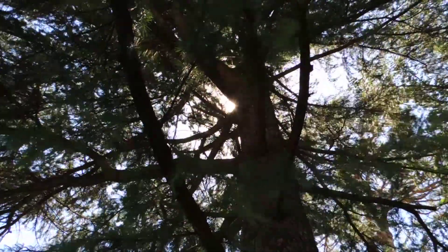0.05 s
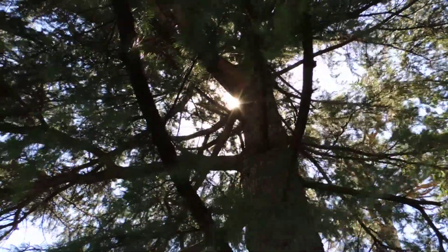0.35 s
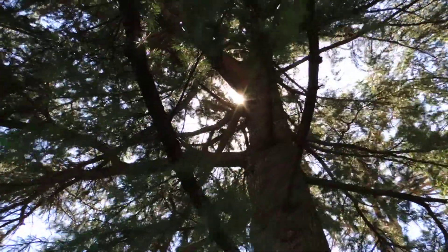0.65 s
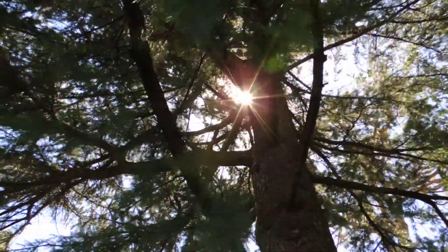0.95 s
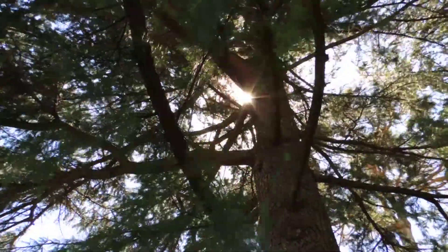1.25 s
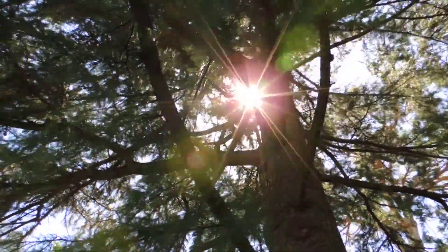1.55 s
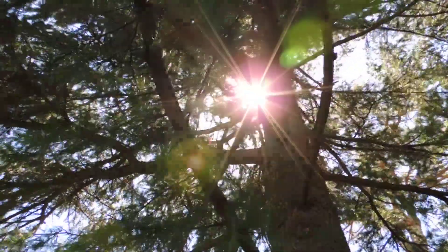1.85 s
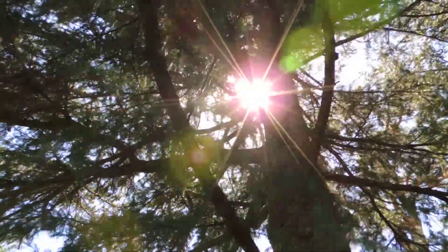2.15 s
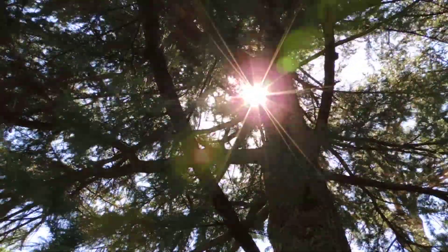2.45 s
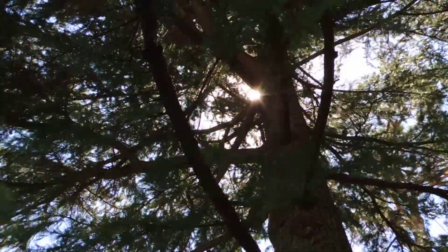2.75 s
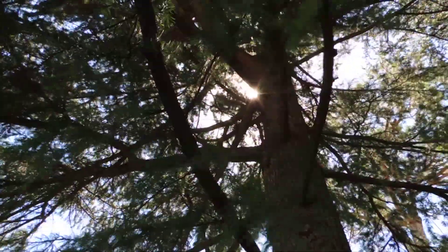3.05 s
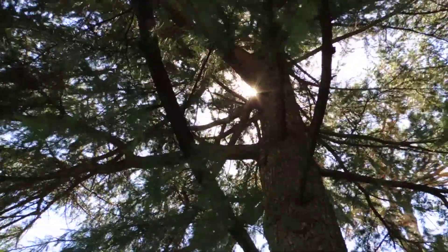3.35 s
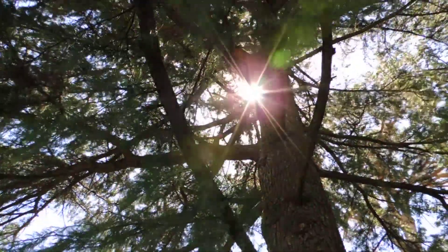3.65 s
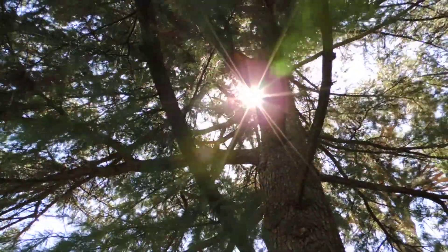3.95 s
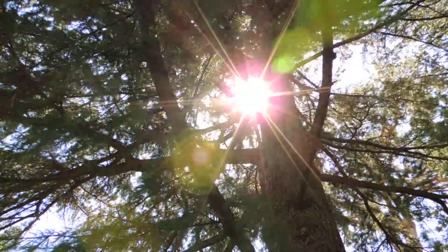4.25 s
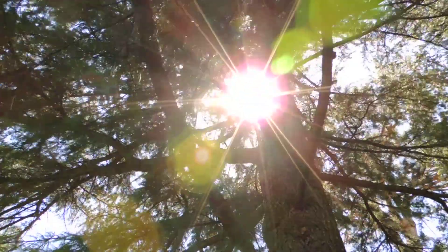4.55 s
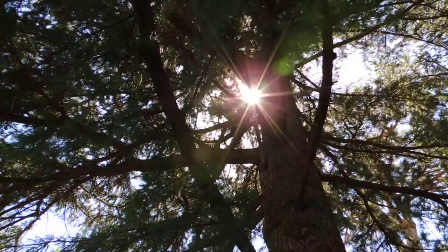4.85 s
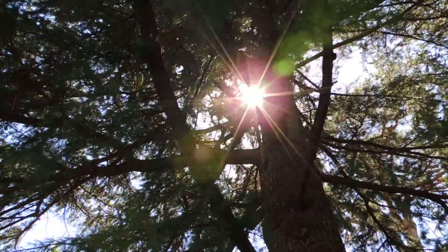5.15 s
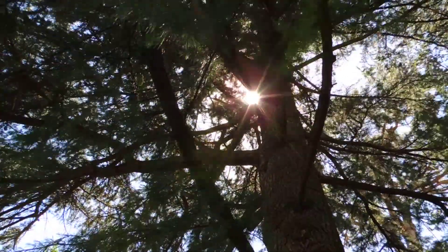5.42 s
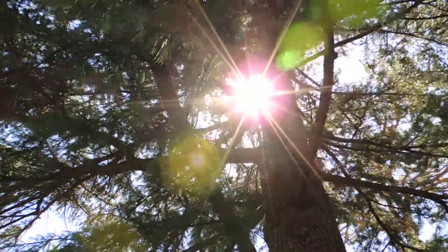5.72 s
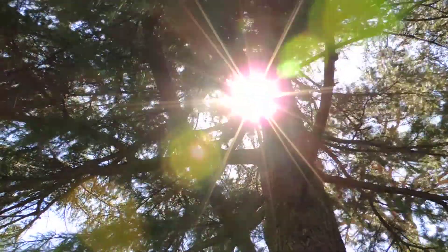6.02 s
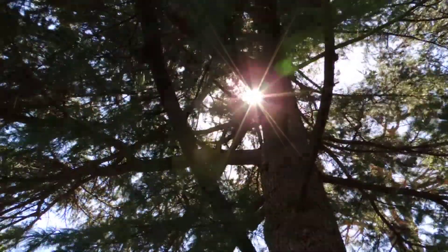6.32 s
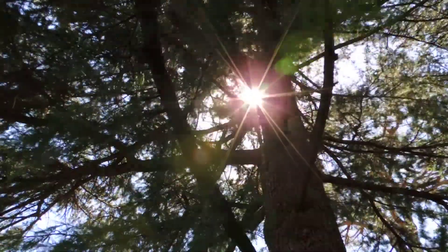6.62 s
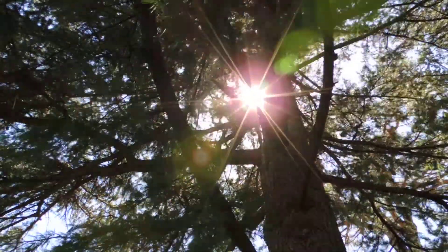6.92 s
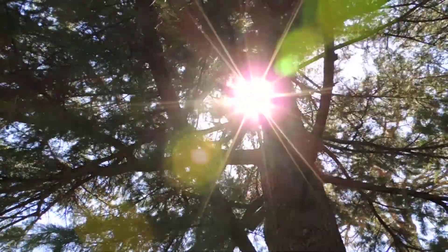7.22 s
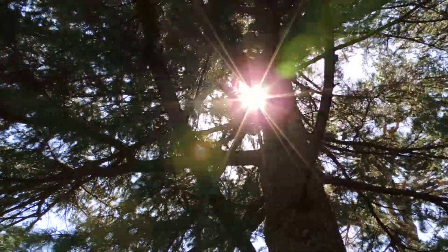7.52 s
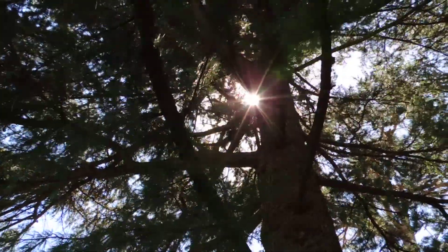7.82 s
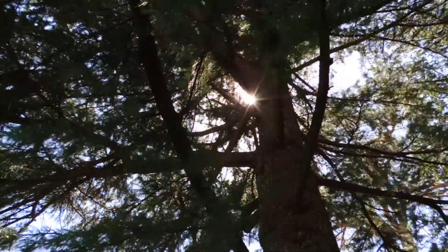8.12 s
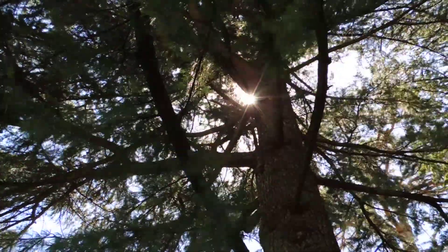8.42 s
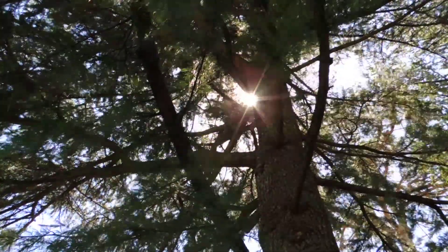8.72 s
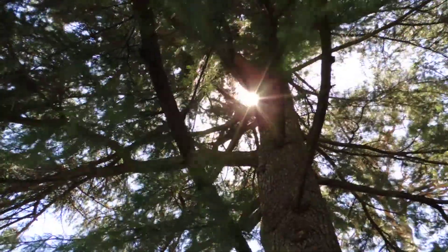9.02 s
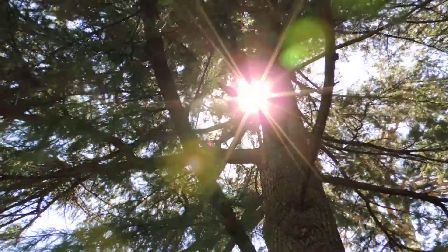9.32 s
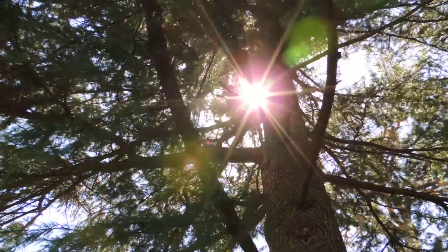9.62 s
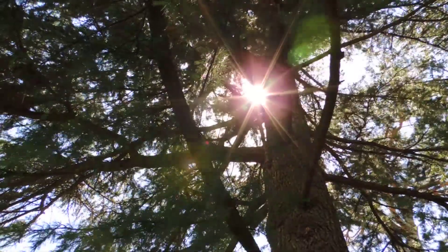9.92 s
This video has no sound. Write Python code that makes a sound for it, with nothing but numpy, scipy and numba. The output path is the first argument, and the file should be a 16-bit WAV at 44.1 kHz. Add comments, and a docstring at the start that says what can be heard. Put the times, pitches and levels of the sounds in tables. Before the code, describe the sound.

Wind rushes steadily through a conifer overhead, a soft roar with a hiss of needles. For the first three seconds, gusts buffet the hand-held microphone with low rumble and sharp thumps. The buffeting then eases and dry twigs tick faintly. Lighter gusts return, a distant bird gives one faint thin note, and a hand brushes the microphone as the wind in the tree slackens.

```python
"""Wind rushes through the crown of a conifer above a hand-held camera. From the start, gusts buffet
the two microphone ports and burst into thumps; the hardest, near 1 s and 2.6 s, make the gain control
duck everything. After 3 s the buffeting eases, and dry twigs tick now and then as they touch.
Near 8 s a far bird gives one thin note. Then, as the wind in the tree slackens, a hand brushes
the camera among the last gusts."""
import sys
import numpy as np
from scipy import signal
from scipy.fft import rfft, irfft, next_fast_len
from scipy.io import wavfile
from scipy.ndimage import uniform_filter1d, map_coordinates
from numba import njit

SR = 44100
rng = np.random.default_rng(int(sys.argv[2]) if len(sys.argv) > 2 else 0)


def wrap_up_sound(samples):
    """Save the sound to the file named by the first command line argument, as 16-bit audio."""
    columns = np.atleast_2d(samples).T
    # keep every value between -1 and 1, then stretch to whole-number steps
    tamed = np.clip(columns, -1, 1)
    steps = np.round(tamed * 32767).astype(np.int16)
    wavfile.write(sys.argv[1], SR, steps)


N = 439677
TIME = np.arange(N) / SR
BURST_TIME = np.arange(-.03, .03, 1 / SR)  # a 60 ms frame centred on a hit

# Levels in the tables are relative; each layer sets its own trim.
# gusts that hit the camera: peak_s, rise_s, left_db, right_db
GUSTS = [(0.02, 0.15, -12.5, -16.5), (0.29, 0.076, -7, -19), (0.48, 0.036, -9, -15.5),
         (0.561, 0.023, -9, -16), (0.73, 0.062, -15, -16.5), (0.96, 0.077, -10, -8), (1.09, 0.024, -7, -2),
         (1.27, 0.21, -5, -18), (1.6, 0.075, -12, -17), (2.291, 0.035, -22, -4), (2.48, 0.074, -5.5, -7),
         (2.678, 0.11, 4.5, 0.5), (2.83, 0.093, -0.5, 0.5), (3.05, 0.15, -2, -8.5),
         (4.31, 0.066, -30, -18.5), (4.52, 0.083, -29, -24), (5.2, 0.057, -28, -34),
         (5.95, 0.065, -30, -17.5), (6.051, 0.069, -20, -16.5), (6.269, 0.026, -19, -17),
         (6.39, 0.063, -28, -21), (6.63, 0.061, -36, -22.5), (6.94, 0.033, -25, -21.5),
         (7.12, 0.039, -28, -19), (7.33, 0.026, -22, -14), (7.52, 0.17, -24.5, -18),
         (7.732, 0.054, -21.5, -12), (7.87, 0.12, -27, -17.5), (8.33, 0.021, -22, -36),
         (8.65, 0.045, -16, -31), (9.114, 0.037, -9.5, -23.5), (9.22, 0.032, -20, -23.5),
         (9.85, 0.12, -33, -23.5)]
# light air that always moves round the camera: time_s, level_db
BREEZE = [(0, -19.5), (1.85, -25.5), (3.3, -25), (3.9, -31), (4.7, -40), (5.6, -40.5), (6.1, -31.5),
          (8.9, -32), (9.3, -33), (9.55, -53), (9.97, -32)]
# large, medium and small eddies at a port: frequency_hz, level_db
RUMBLE_EQ = [(10, -43), (25, 0.5), (40, -1.5), (65, 1.5), (100, -1), (160, -5.5), (250, -17), (400, -27.5),
             (800, -69), (2000, -77)]
FLUTTER_EQ = [(40, -17), (110, 1), (190, 5), (320, -0.5), (500, -10.5), (800, -22), (1400, -46),
              (2500, -46), (6000, -77)]
SPUTTER_EQ = [(150, 2), (400, 12), (700, 4), (1100, -4.5), (1700, -18), (2600, -45.5), (6000, -53)]
# eddies that burst on a port: centre_s, level_db, relative_crack_db, side (1 left, -1 right)
THUMPS = [(0.492, 2.5, -19, 1), (0.554, 2, -17.5, 1), (0.85, 1, -17, -1), (1.05, 0, -11, -1),
          (1.088, 8.5, -1.5, -1), (1.095, 10, -3.5, -1), (1.108, 6, -0.5, -1), (1.131, 8, -18, -1),
          (1.191, 5, -16, -1), (2.29, 3, 4, -1), (2.304, 3.5, -10, -1), (2.389, 1, -17.5, -1),
          (2.422, 2, -9, -1), (2.588, 11.5, -14, -1), (2.605, 8.5, 1, -1), (2.667, 3.5, -6, -1),
          (2.702, 2.5, -2, -1), (2.752, 6.5, -5, -1), (2.943, 8, -8.5, -1), (2.951, 5.5, -3.5, -1),
          (4.32, -4, -9.5, -1), (4.889, -15.5, -37, 1), (5.194, -10, -34.5, 1), (6.388, -9, -19, -1),
          (6.592, -12.5, -18, -1), (6.665, -9.5, -27.5, -1), (6.97, -8, -28, -1), (7.325, -3, -13, -1),
          (7.336, -6, -15.5, -1), (7.462, -7, -17, -1), (9.117, -6, -23, 1), (9.9, -8, -5.5, -1)]
# a thump's midrange crack and the brighter edge that grows on the hardest ones: frequency_hz, level_db
CRACK_EQ = [(300, 3), (900, 12), (1800, 1), (3000, -18), (5000, -34), (14000, -36)]
TEAR_EQ = [(800, -3), (1400, 4), (2100, 0), (3000, -9), (4500, -21), (7000, -24), (14000, -35)]
# strength of the wind in the crown: time_s, level_db
CROWN_WIND = [(0, 0), (0.5, 1), (0.75, -1), (2.2, -0.5), (4.1, 0.7), (5.25, -2.5), (6.3, -0.5), (7.64, -4),
              (8.0, -3), (9.55, -7), (9.97, -7)]
# wind over thick boughs, thin boughs and needles: frequency_hz, level_db
ROAR_EQ = [(100, -6), (250, -3.5), (450, -1), (620, 1.5), (900, 0.5), (1300, -6), (2000, -34), (4000, -54)]
BOUGH_EQ = [(400, -9), (900, -9.5), (1300, -1), (1850, -0.5), (2500, -5.5), (3500, -9), (6000, -19),
            (14000, -32)]
NEEDLE_EQ = [(600, 2.5), (2000, -3), (3200, 2), (5000, 1.5), (7000, 0.5), (10000, -1.5), (12500, -1.5),
             (14300, -6.5)]
# how alike the tree sounds at the two ports: frequency_hz, likeness (0 wide, 1 or more mono)
TREE_LIKENESS = [(200, 5), (700, 1.15), (1300, 1.6), (2000, 1.16), (3000, 0.29), (8000, -0.0847)]
# where the tree sits in the stereo image: frequency_hz, left_minus_right_db
TREE_PAN = [(700, 0.26), (1900, -1.2), (4000, -.2), (9000, 0.47)]
# dry twigs touching: time_s, level_db
TWIG_TICKS = [(2.2508, -19.5), (2.9781, -28), (3.5174, -27), (4.2094, -27), (5.4494, -25), (7.9494, -27),
              (7.9753, -25)]
# a hand brushing the case: start_s, level_db, rise_s
HAND_STROKES = [(8.637, -30.5, 0.026), (9.698, -24.5, 0.028), (9.765, -39, 0.018)]
# skin rubbing on the case: frequency_hz, level_db
SKIN_EQ = [(300, -32), (800, 1.5), (1200, 5), (1900, -3), (2800, -16), (6000, -23), (14000, -48)]


def buffeting(port, flutter_db, sputter_db, moderate_db=-15, max_excess_db=4.5):
    """Eddies at one port: faster air adds smaller, brighter and more ragged ones to the rumble."""
    air_db, depth_db = airflow(port)
    excess_db = np.minimum(air_db - moderate_db, max_excess_db)  # drives the brightness
    flap_db = 1.7 * wobble(22)
    rumble = amp(air_db + flap_db - 0.21 + .5 * depth_db) * turbulence(RUMBLE_EQ, steady_s=0.0634)
    ragged = unit(amp(flap_db + 3.33 * wobble(45) + 3.76 * wobble(160)))
    flutter_gain = amp(air_db + flutter_db + 0.15 * excess_db - 1.02 * depth_db)
    flutter = flutter_gain * ragged * turbulence(FLUTTER_EQ, steady_s=0.0405)
    # the flow tears off the edge of the port in short, separate spurts
    spurts = unit(np.clip(0.39 * wobble(40) + wobble(220) - .2, 0, 1.5))
    sputter_gain = amp(air_db + sputter_db + 1.4 * excess_db)
    sputter = sputter_gain * spurts * turbulence(SPUTTER_EQ, steady_s=0.0135)
    return rumble + flutter + sputter


def airflow(port, fall_ratio=0.91, roundness=1.26, neutral_rise_s=0.094, depth_db_per_octave=3):
    """Air strength and eddy depth in dB: gusts ride a restless breeze, longer ones with deeper eddies."""
    power = amp(automation(BREEZE) + 1.6 * wobble(9)) ** 2
    weighted_octaves = np.zeros(N)
    for peak_s, rise_s, *port_db in GUSTS:
        from_peak = np.maximum(peak_s - TIME, (TIME - peak_s) / fall_ratio) / rise_s
        near = from_peak < 5
        gust_power = (amp(port_db[port]) * np.exp(-from_peak[near] ** roundness)) ** 2
        power[near] += gust_power
        weighted_octaves[near] += gust_power * np.log2(rise_s / neutral_rise_s)
    return 10 * np.log10(power), depth_db_per_octave * weighted_octaves / power


def turbulence(eq, steady_s):
    """Pressure noise at one port, its slow swings evened out so that the gust sets its strength."""
    noise = coloured(rng.standard_normal(N), eq)
    return noise / np.sqrt(running_power(noise, steady_s) + 1e-6)


def thumps(width_cycles=0.6, thud_hz=392, octaves_per_db=0.0645):
    """An eddy bursts on one port: a swing or two of pressure with a rough crack on top."""
    out = np.zeros((2, N))
    phases = rng.uniform(0, 2 * np.pi, len(THUMPS))
    for (centre_s, level_db, crack_db, side), phase in zip(THUMPS, phases):
        hz = thud_hz * 2 ** (octaves_per_db * crack_db)  # less crack, lower thud
        turns = np.arcsinh(2 * hz * BURST_TIME) / 2 + hz * BURST_TIME / 10  # quickest as the core passes
        swing = np.exp(1j * (2 * np.pi * turns + phase) - (turns / width_cycles) ** 2 / 2)
        thud = amp(-4) * np.imag(swing + amp(-3.5) * swing ** 2)  # steepened at its height
        crack = amp(crack_db - 4.5) * puff(CRACK_EQ, width_s=0.0014)
        tear = amp(1.5 * crack_db - 11.5) * puff(TEAR_EQ, width_s=0.0013)  # grows faster than the crack
        add(out[int(side < 0)], centre_s - .03, amp(level_db) * (thud + crack + tear))
    return out


def tree(roar_follows=0.44, needles_follow=0.68):
    """Thick boughs roar, thin ones rush, needles hiss; the roar lingers as the wind slackens."""
    wind_db = automation(CROWN_WIND) + .3 * wobble(8)
    roar = amp(roar_follows * wind_db - 35.5) * rush(ROAR_EQ, patchy_db=1.36, lag_ms=0.098)
    boughs = amp(wind_db - 34.5) * rush(BOUGH_EQ, patchy_db=0.9, lag_ms=0.098)
    needles = amp(needles_follow * wind_db - 39.5) * rush(NEEDLE_EQ, patchy_db=1.06, lag_ms=0.073)
    return roar + boughs + needles


def rush(eq, patchy_db, lag_ms):
    """Airy stereo noise with drifting patches of colour; it reaches the right port first."""
    def width(hz):
        angle = np.arccos(np.clip(along(TREE_LIKENESS, hz), -1, 1)) / 2
        return np.array([np.cos(angle), np.sin(angle)])

    def placement(hz):
        delay = np.exp(1j * np.pi * np.outer([-1, 1], hz) * lag_ms / 1000)
        return pan(along(TREE_PAN, hz)) * delay

    spectra = signal.stft(rng.standard_normal((2, N)), nperseg=512)[2]
    patches = uniform_filter1d(rng.standard_normal(spectra.shape[1:]), size=5, axis=0)  # across pitch
    patches = uniform_filter1d(patches, size=16, axis=1)  # across time
    noise = signal.istft(spectra * amp(patchy_db * patches / patches.std()), nperseg=512)[1][:, :N]
    mid, side = filtered(coloured(noise, eq), width)
    return filtered(np.array([mid + side, mid - side]), placement)


def twigs():
    """Dry twigs touch, each time in a tiny cluster of bright snaps."""
    out = np.zeros((2, N))
    snap_eq = [(2000, -20), (6000, 2), (11000, 0), (14000, -1)]  # frequency_hz, level_db
    for time_s, level_db in TWIG_TICKS:
        snaps = np.array([puff(snap_eq, width_s=0.0048) for port in range(2)])
        add(out, time_s - .026, amp(level_db - 4.5) * snaps)
    return out


def hand():
    """Skin rubs on the case in quick swells of grainy friction."""
    swells = np.zeros(N)
    for start_s, level_db, rise_s in HAND_STROKES:
        progress = np.maximum(TIME - start_s, 0) / rise_s
        swells += amp(level_db) * progress * np.exp(1 - progress)
    grain = amp(1.6 * wobble(180) - 6.5)
    return swells * grain * coloured(rng.standard_normal(N), SKIN_EQ)


def bird(start_s=7.74, end_s=7.93, pitch_hz=3270, level_db=-41):
    """A far bird's thin, wavering note, blurred by the trees."""
    wavering_hz = pitch_hz + 30 * wobble(45) + 110 * wobble(500)
    fade = np.interp(TIME, [start_s - .015, start_s + .015, end_s - .07, end_s + .03], [0, 1, 1, 0])
    return amp(level_db + wobble(110)) * fade * np.sin(2 * np.pi * np.cumsum(wavering_hz) / SR)


def gain_control(x, ceiling_db=-5, detect_s=0.013, react_s=0.0055):
    """A blast on either port ducks both, just late enough to let its attack through."""
    power = running_power(x, detect_s).max(axis=0)
    over_db = 10 * np.log10(power + 1e-12) - ceiling_db
    # the gain starts out ducked
    cut_db = ducking(over_db, cut_db=4.5, wait_s=0.19, hold_s=0.5, release_db_per_s=20)
    return x * amp(-np.interp(TIME - react_s, TIME, cut_db))


@njit
def ducking(over_db, cut_db, wait_s, hold_s, release_db_per_s):
    """The gain cut jumps to meet any overshoot, holds, then releases steadily."""
    out = np.zeros(len(over_db))
    wait_samples = wait_s * SR
    for i in range(len(over_db)):
        wait_samples -= 1
        if over_db[i] > cut_db:
            cut_db, wait_samples = over_db[i], hold_s * SR
        elif wait_samples < 0:
            cut_db = max(cut_db - release_db_per_s / SR, 0.0)
        out[i] = cut_db
    return out


def puff(eq, width_s):
    """A short pressure burst of peak 1, centred in its frame."""
    noise = coloured(rng.standard_normal(len(BURST_TIME)), eq)
    burst = noise * np.exp(-(BURST_TIME / width_s) ** 2 / 2)
    return burst / np.abs(burst).max()


def amp(db):
    """Decibels to gain."""
    return 10 ** (np.asarray(db) / 20)


def unit(x):
    """Scale to rms 1."""
    return x / np.sqrt(np.mean(x ** 2, axis=-1, keepdims=True) + 1e-20)


def running_power(x, window_s):
    """Mean square over a sliding window."""
    return np.abs(uniform_filter1d(x ** 2, int(window_s * SR)))


def along(points, hz):
    """Read (frequency_hz, value) points on a log axis."""
    frequencies, values = np.transpose(points)
    return np.interp(np.log(hz + 1), np.log(frequencies + 1), values)


def automation(points):
    """A fader ride through (time_s, level_db) points."""
    return np.interp(TIME, *np.transpose(points))


def wobble(rate_hz):
    """A smooth random curve with rate_hz knots a second."""
    return map_coordinates(rng.standard_normal(4096), [TIME * rate_hz], mode="mirror")


def filtered(x, response):
    """Shape x by a response that is a function of frequency."""
    size = x.shape[-1]
    padded = next_fast_len(size + 4096)
    return irfft(rfft(x, padded) * response(np.fft.rfftfreq(padded, 1 / SR)), padded)[..., :size]


def coloured(x, eq):
    """x through an EQ curve, at rms 1."""
    return unit(filtered(x, lambda hz: amp(along(eq, hz))))


def pan(pan_db):
    """Left and right gains of mean power 1."""
    pair = np.array([amp(pan_db / 2), amp(-pan_db / 2)])
    return pair / np.sqrt(np.mean(pair ** 2, axis=0))


def add(track, start_s, sound):
    """Mix a sound into a track from start_s."""
    start = max(0, round(start_s * SR))
    part = track[..., start:start + sound.shape[-1]]
    part += sound[..., :part.shape[-1]]


def scene():
    """The tree overhead, the far bird, and the air and the hand at the camera."""
    left = buffeting(port=0, flutter_db=-8, sputter_db=-32)
    right = buffeting(port=1, flutter_db=-6, sputter_db=-15.5)
    return tree() + twigs() + bird() + hand() + np.array([left, right]) + thumps()


def record(dry, top_hz=14300):
    """Gain control, peaks rounded off at full scale, then a brick-wall low-pass."""
    levelled = gain_control(dry)
    rounded = levelled / (1 + np.abs(levelled) ** 6) ** (1 / 6)
    return filtered(rounded, lambda hz: hz < top_hz)


dry = scene()
out = record(dry)
wrap_up_sound(out)
```